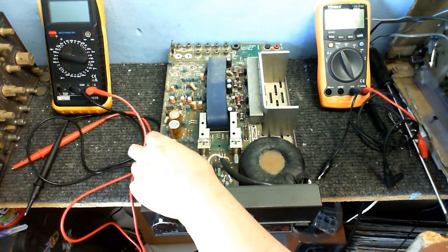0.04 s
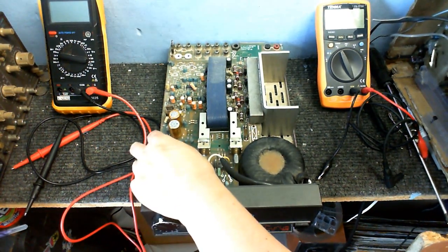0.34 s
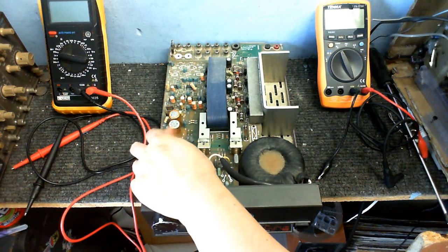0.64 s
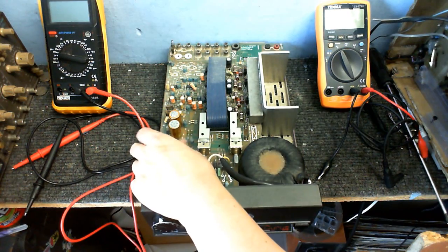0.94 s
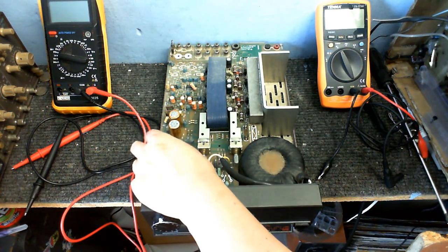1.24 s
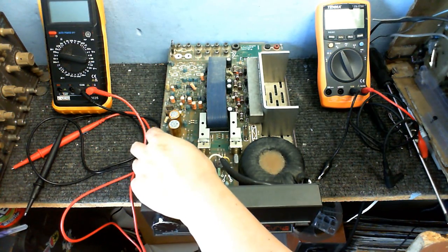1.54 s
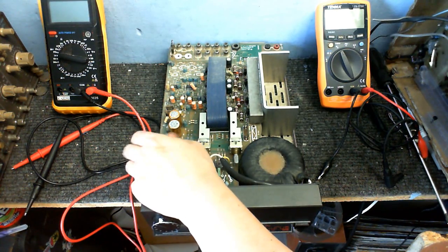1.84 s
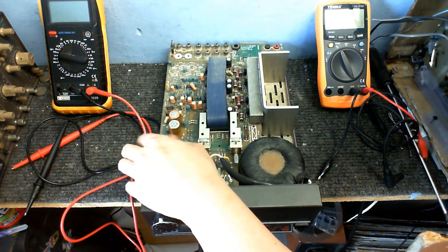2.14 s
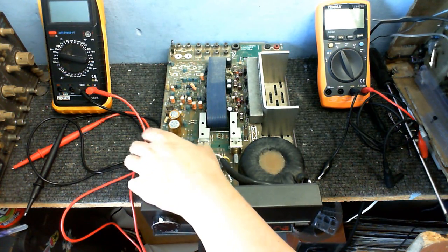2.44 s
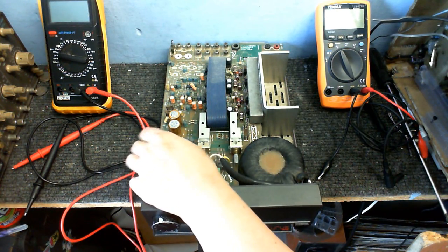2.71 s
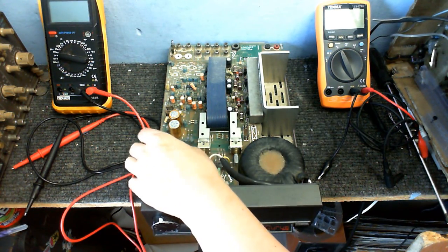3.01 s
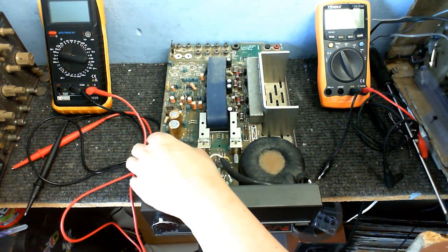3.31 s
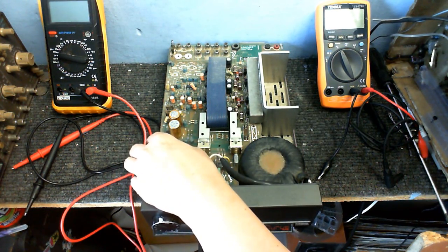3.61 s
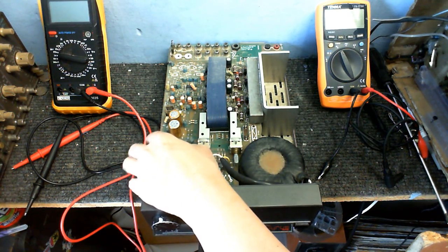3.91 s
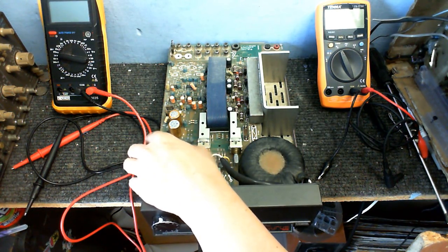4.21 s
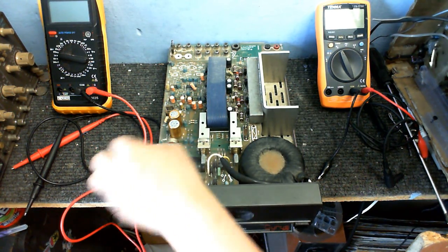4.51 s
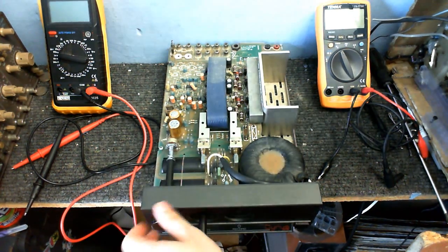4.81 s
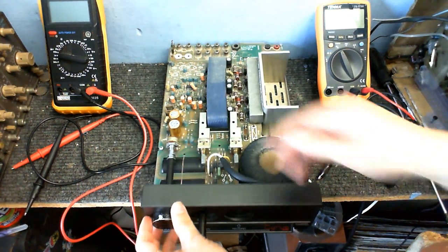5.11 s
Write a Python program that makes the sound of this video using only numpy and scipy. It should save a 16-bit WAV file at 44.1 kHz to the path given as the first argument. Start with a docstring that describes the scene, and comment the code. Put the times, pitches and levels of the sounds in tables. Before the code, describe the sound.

A screw is turned out of the metal front panel of an open amplifier. The tool ticks and grinds irregularly in the screw head, and the chassis answers with small knocks and short rings. After a louder cluster midway, the loosened screw clinks in its hole. Near the end an arm brushes softly past and the panel starts to drag. One nearby microphone in a small room picks up faint mains hum underneath.

```python
"""A workbench in a small room, one mono microphone nearby, on an open amplifier.
A screw is turned out of the metal front panel: the tool ticks and grinds in the screw head, the chassis
answers with knocks and short rings, and the loosened screw clinks in its hole. Late on, an arm brushes
softly past and the hand starts to pull the panel. Mains hum and room tone lie underneath."""
import sys
import numpy as np
from scipy import signal
from scipy.fft import rfft, irfft
from scipy.io import wavfile

SR = 44100
rng = np.random.default_rng(int(sys.argv[2]) if len(sys.argv) > 2 else 0)


def waveform_to_disk(signal):
    """Save audio, clipped to [-1, 1], as 16-bit WAV at the path in sys.argv[1]."""
    frames = np.transpose(np.atleast_2d(signal))
    scaled = np.clip(frames, -1, 1) * 32767
    samples = np.round(scaled).astype(np.int16)
    wavfile.write(sys.argv[1], SR, samples)


N = 227247
TIME = np.arange(N) / SR

# Event levels are relative within a table. Weight swells the lows; brightness tilts towards the treble.
# The tip catching in the screw head. Each row: start in seconds, level in dB, weight in dB,
# brightness in dB per octave, clack pitch in Hz.
TIP_CLICKS = [(0.082, -49.5, 17, 4, 2300), (0.129, -49.5, -15, -8, 2180), (0.159, -34.5, 0.5, -.5, 2240),
              (0.37, -47.5, -14, 2, 2410), (0.382, -51.5, 14.5, 3, 2300), (0.595, -44.5, 7, 4, 2080),
              (0.772, -36, -1.5, 1.5, 1980), (1.003, -39, 10.5, 3.66, 2020), (1.229, -47, 2, 0, 2050),
              (1.479, -41, -13, -1, 2030), (1.699, -43.5, -17, -4, 2190), (1.756, -48, -9, 2, 2200),
              (1.765, -47, -12, 1.5, 2150), (1.989, -46, 0, 1.5, 2010), (2.268, -55.5, 2, 4, 2020),
              (2.405, -43.5, -7.5, -3, 2290), (2.612, -38, -15, -2, 1760), (2.629, -29.5, 7.5, 1.5, 2480),
              (2.672, -33.5, -16, 2, 2340), (2.688, -34.5, 0, -2, 2380), (2.826, -33, -18, .5, 2070),
              (3.784, -37.5, -5, 1.5, 2060), (4.178, -38, -8.5, -.5, 2260), (4.473, -37, -21, -2, 2080),
              (4.993, -34, -21, -1, 2920), (5.032, -42, 1, 1, 2200)]
# The panel giving under tool or hand. Each row: start in seconds, level in dB, weight in dB,
# brightness in dB per octave, thud pitch in Hz, clack pitch in Hz.
PANEL_KNOCKS = [(0.567, -35, -2, -1.5, 680, 2110), (1.271, -30.5, -8.5, -1.5, 416, 1760),
                (1.515, -44, 13, 3.5, 500, 2000), (1.726, -43, -15, -7, 436, 1930),
                (2.243, -48, -3, 2, 606, 1930), (2.376, -49, -12, -2.5, 440, 1930),
                (2.845, -28.5, -1, 3, 591, 2540), (2.864, -27, -6.5, 0, 440, 1880),
                (3.181, -48.5, -3, -1.5, 420, 2140), (3.223, -48, 0.5, -0.5, 575, 2070),
                (3.907, -43, 9, 2.5, 650, 1910), (4.486, -34, -4, -1, 770, 2260),
                (4.894, -45, 3, -0.5, 452, 1510), (4.997, -35.5, -2.5, 0.5, 710, 1710)]
# The bare steel tip, lightly touched. Each row: start in seconds, level in dB, pitch in Hz.
TIP_PINGS = [(0.318, -50.5, 6700), (0.545, -43.5, 8830), (0.774, -36, 8050), (1.973, -46.5, 6900),
             (2.405, -39, 6760), (2.544, -37, 6860), (2.611, -42, 6800), (2.826, -35, 6750),
             (3.224, -50.5, 6630), (3.784, -37, 6700)]
# The loose screw in its hole. Each row: start in seconds, level in dB, brightness in dB per octave.
SCREW_CLINKS = [(3.589, -47.5, 2.5), (3.797, -44, 1), (3.944, -42.5, 5), (4.261, -44.5, 1.5),
                (4.271, -42.5, 2.5), (4.352, -38.5, 6.5), (4.368, -32.5, 3), (4.38, -37.5, 3)]
# Metal dragging on metal. Each row: time of the hardest push, swell and fade, all in seconds,
# level in dB, weight in dB, brightness in dB per octave.
SCRAPE_STROKES = [(0.003, 0.0037, 0.022, -49, 24, 4), (0.154, 0.1, .005, -60.5, 17, 5.5),
                  (0.345, .015, 0.033, -57, 2, 3), (1.238, 0.0078, 0.021, -53, 23.5, 5),
                  (1.297, 0.013, 0.01, -58, 20.5, -2), (1.731, 0.0046, 0.026, -43.5, 4.5, 0),
                  (2.02, 0.046, 0.0067, -40.5, -2.5, -2.5), (2.253, 0.021, 0.04, -49.5, 7, 0),
                  (2.38, 0.022, 0.017, -53.5, -2, -1), (2.635, .047, .055, -33.5, 8, 2),
                  (2.836, 0.0087, 0.017, -22.5, -26, -7), (2.875, 0.022, 0.017, -32, -7.5, -5),
                  (3.901, 0.015, 0.02, -50, 7.5, -3), (3.967, .035, 0.087, -49.5, -1.5, -1.5),
                  (4.277, 0.0063, 0.18, -51, -22, -8.5), (4.374, 0.021, 0.013, -30.5, -10, -4.5),
                  (4.898, .028, 0.023, -48, 14, 5), (4.998, .02, 0.036, -38.5, 0, 1.5)]
# Sheet metal flexing. Each row: start in seconds, level in dB, pitch in Hz, 60 dB decay in seconds.
SHEET_SNAPS = [(0.158, -27.5, 2990, 0.032), (0.162, -32, 478, 0.064), (0.567, -33, 1240, 0.0071),
               (1.2715, -13.5, 1730, 0.013), (1.283, -34, 171, 0.15), (2.241, -35.5, 705, 0.028),
               (2.376, -40, 2000, 0.043), (2.865, -33.5, 292, 0.13), (3.946, -44, 2070, 0.14),
               (4.997, -30.5, 750, 0.06)]
# The chassis rocking under the hand. Each row: start in seconds, level in dB, pitch in Hz.
CHASSIS_BUMPS = [(0.009, -50, 388), (0.067, -47.5, 408), (0.725, -56.5, 550), (0.931, -54, 432),
                 (1.021, -44.5, 423), (1.089, -47.5, 424), (1.649, -56, 418), (1.837, -60.5, 363),
                 (3.003, -51.5, 420), (3.088, -49.5, 413), (3.18, -51.5, 423), (3.225, -49.5, 593),
                 (3.27, -54, 422)]

# The six parts of a contact, low to high: thud, knock, clack, tick, ping, splash. Each row: gain in
# a tap and in a scrape in dB, reflections in dB, their 60 dB decay and their build-up in seconds.
CONTACT_PARTS = [(-6.5, -14, 2, 0.22, 0.0043), (-5, -13, 10.5, 0.2, 0.0014), (0, -5, 1, 0.23, 0.0046),
                 (-1.5, -7, 3, 0.21, 0.0029), (-1.5, -13.5, -2, 0.24, 0.00072),
                 (10.5, -23.5, 4, 0.19, 0.0028)]
# The balance of each kind of contact. Each gives the six parts in dB, thud first.
CLICK_MIX = (-12.5, -14.5, -1, -1, -1.5, -18.5)
KNOCK_MIX = (-1, -9, 1, -4.5, -10.5, -27.5)
PING_MIX = (-15.5, -52, -14, -13, -0.5, -26)
CLINK_MIX = (-16.5, -9, -1, -7.5, -16.5, -47)
SCRAPE_MIX = (-5, -9, 0.5, -1, -0.5, 0.5)
# The share of the weight each part takes, from 0 to 1: only thud and knock swell.
WEIGHT_SHARE = (1, .4, 0, 0, 0, 0)

# Resonances of the chassis, the loose screw, the pulled panel and the brushing.
# Each row: pitch in Hz, width in Hz, lift in dB.
CHASSIS_MODES = [(170.2, 11.4, 15), (302, 6.6, 6.5), (435.2, 23, 11.5), (471.4, 45, 2.5), (521, 74, 6),
                 (606.4, 20.5, 11), (753, 57, 9.5), (835.6, 12.8, 11.5), (994, 10.6, 9), (1177, 15, 10),
                 (1290, 12.5, 9), (1744, 20, 4.5), (1927, 32, 7), (2160, 20, 5), (2325, 18, 9.5),
                 (2446, 29, -5.5), (2536, 6.9, 9.5), (2822, 21, 8), (3075, 26, 7.5), (3260, 130, 5.5),
                 (4040, 50, 7), (4417, 31, 8.5), (4950, 10, 7), (5415, 31, 7), (5630, 50, 9),
                 (5950, 6.6, -15), (6924, 400, 7), (6740, 29, 7), (7140, 1520, -7.5), (8090, 410, 7)]
SCREW_MODES = [(823, 74, 6), (942, 60, 12), (1258, 35, 12.5), (1958, 32, 8.5), (2200, 170, 10.5)]
PANEL_MODES = [(759, 30, 5.5), (985, 21, 17), (1430, 24, 14.5), (1750, 50, 11)]
BRUSH_PEAKS = [(3170, 73, 8), (4540, 350, 5), (5470, 250, 3.5), (8040, 350, 12.5), (9750, 340, 5.5),
               (12100, 660, 19.5)]
# The swell of the arm going past. Each row: time in seconds, level in dB.
BRUSH_SWELL = [(4.45, -65), (4.842, -55.5), (5.03, -49.5), (5.1, -59.5)]
# The colour of the brushing and of the room tone. Each row: frequency in Hz, relative density in dB.
BRUSH_COLOUR = [(120, -39), (200, -16), (422, 3), (479, -2.5), (1010, -5), (1190, -12), (1910, -15.5),
                (2420, -9), (4580, -4.5), (8200, -21), (15500, -28)]
ROOM_COLOUR = [(15, -60), (25, -13.5), (64, -20.5), (91, -0.5), (133, -39), (169, -21), (523, -10),
               (666, -11), (970, -14), (1200, -15.5), (1300, -21.5), (1410, -18), (3530, -23),
               (8580, -31.5), (15500, -16.5)]
# Mains hum. Each row: pitch in Hz, rms level in dB.
MAINS_HUM = [(50, -75), (120, -64)]
# The microphone's response. Each row: frequency in Hz, gain in dB.
MIC_RESPONSE = [(7000, -2.5), (8400, -3.5), (9400, -9.5), (11500, -21.0), (13500, -26.5), (15500, -28)]

THUD_HZ, CLACK_HZ, PING_HZ = 430, 2050, 6830   # usual pitches of a contact
SLIDE_S = .014   # the tip slides this long before it catches


def taps():
    """Tool, panel and screw strike one another: clicks, knocks, pings and clinks."""
    struck, loose = np.zeros(N), np.zeros(N)
    for s, level_db, weight_db, tilt_db, clack_hz in TIP_CLICKS:
        add(struck, s - SLIDE_S, touch(CLICK_MIX, level_db, .0031, weight_db, tilt_db, clack_hz=clack_hz))
    for s, level_db, weight_db, tilt_db, thud_hz, clack_hz in PANEL_KNOCKS:
        knock = touch(KNOCK_MIX, level_db, .00096, weight_db, tilt_db, thud_hz=thud_hz, clack_hz=clack_hz)
        add(struck, s - SLIDE_S, knock)
    for s, level_db, hz in TIP_PINGS:
        add(struck, s - SLIDE_S, touch(PING_MIX, level_db, .00082, ping_hz=hz))
    for s, level_db, tilt_db in SCREW_CLINKS:
        add(loose, s - SLIDE_S, touch(CLINK_MIX, level_db, .0025, tilt_db=tilt_db))
    gain = np.sqrt(.0026 * SR)
    return gain * (struck + resonances(loose, SCREW_MODES))


def touch(mix, level_db, firm_rise_s, weight_db=0, tilt_db=0, firm_db=-38, softness=.25, **pitches):
    """All six parts sound together, and a light touch rises more slowly than a firm one."""
    rise_s = firm_rise_s * from_db(softness * (firm_db - level_db))
    parts = zip(part_levels(mix, level_db, weight_db, tilt_db), part_bands(**pitches), CONTACT_PARTS)
    return sum(from_db(db + tap_db) * contact(edges_hz, rise_s, *room)
               for db, edges_hz, (tap_db, _, *room) in parts)


def contact(edges_hz, rise_s, wet_db, t60, build_s, slide_db=-15, slide_rise_s=.0032, size=14000):
    """One band of a touch: the tip slides in, catches with a crack, and bench and walls reflect it."""
    t = TIME[:size] - SLIDE_S
    after = np.maximum(t, 0)
    age = after / max(rise_s, .0002)
    catch = age ** 2 * np.exp(2 * (1 - age))
    slide = from_db(slide_db) * np.exp(-abs(t) / slide_rise_s)
    reflections = from_db(-60 * after / t60) * (1 - np.exp(-after / build_s))
    envelopes = np.array([catch + slide, reflections])
    crack, tail = band(envelopes * rng.standard_normal((2, size)), *edges_hz)
    return unit_energy(crack) + from_db(wet_db) * unit_energy(tail)


def part_bands(thud_hz=THUD_HZ, clack_hz=CLACK_HZ, ping_hz=PING_HZ):
    """Edges in Hz of the six parts; the clack is the panel, the ping the steel tip."""
    return [(thud_hz / 3.27, thud_hz * 1.49), (620, 1400), (clack_hz - 290, clack_hz + 290),
            (2650, 5900), (ping_hz - 575, ping_hz + 575), (8400, 15000)]


def part_levels(mix, level_db, weight_db, tilt_db):
    """Level of each part: weight swells the lows, brightness tilts the whole about the clack."""
    octaves = np.log2(np.mean(part_bands(), axis=1) / CLACK_HZ)
    return level_db + np.array(mix) + weight_db * np.array(WEIGHT_SHARE) + tilt_db * octaves


def scrapes(points=3, swell_db=17.5):
    """Metal grinds on metal: each stroke is a run of slips at a few points, each with its own ring."""
    out = np.zeros(N)
    bands = part_bands(thud_hz=380, clack_hz=2095, ping_hz=7050)
    for s, swell_s, fade_s, level_db, weight_db, tilt_db in SCRAPE_STROKES:
        t = np.arange(-swell_s, fade_s, 1 / SR)
        push = from_db(-swell_db * np.maximum(-t / swell_s, t / fade_s))
        levels = part_levels(SCRAPE_MIX, level_db, weight_db, tilt_db)
        for _ in range(points):
            friction = push * slips(len(t), per_s=220, spread_db=1.5, hiss=.16) / np.sqrt(points)
            response = sum(from_db(db + scrape_db) * contact(edges_hz, .00051, *room)
                           for db, edges_hz, (_, scrape_db, *room) in zip(levels, bands, CONTACT_PARTS))
            add(out, s - swell_s - SLIDE_S, signal.fftconvolve(friction, response))
    return out


def slips(size, per_s, spread_db, hiss):
    """Stick-slip friction: uneven tiny jerks on a fine hiss."""
    strength = from_db(spread_db * np.clip(rng.standard_normal(size), -2, 2))
    direction = rng.choice([-1, 1], size)
    slipping = rng.random(size) < per_s / SR
    return rms_one(slipping * strength * direction) + hiss * rng.standard_normal(size)


def metal_rings(tip_lift_db=6):
    """Thin sheet flexes and rings on one clear pitch, and so does the steel tip at each ping."""
    out = np.zeros(N)
    for s, level_db, hz, t60 in SHEET_SNAPS:
        add(out, s, ring(level_db, hz, t60, rise_s=.00028))
    for s, level_db, hz in TIP_PINGS:
        add(out, s, ring(level_db + tip_lift_db, hz, t60=.035, rise_s=.0015))
    return out


def ring(level_db, hz, t60, rise_s):
    """One mode, struck and dying away."""
    t = np.arange(0, t60, 1 / SR)
    envelope = (1 - np.exp(-t / rise_s)) * from_db(-60 * t / t60)
    return from_db(level_db) * envelope * np.sin(2 * np.pi * hz * t)


def panel_drag(start_s=5.088, rise_s=.023, level_db=-41.5):
    """The hand pulls the panel: a steady run of slips rings a few of its modes."""
    friction = band(slips(N, per_s=440, spread_db=-.5, hiss=.95), 700, 3050)
    pull = np.clip((TIME - start_s) / rise_s, 0, 1)
    return from_db(level_db) * pull * rms_one(resonances(friction, PANEL_MODES))


def arm_brush(rustle_gain_db=6, rumble_gain_db=2, fade_s=.13):
    """The arm brushes past: a smooth rustle with a few peaks, over a low rumble."""
    s, db = np.transpose(BRUSH_SWELL)
    fade = np.clip(np.minimum(TIME - s[0], s[-1] + fade_s - TIME) / fade_s, 0, 1)
    rustle = from_db(rustle_gain_db) * rms_one(resonances(coloured_noise(BRUSH_COLOUR), BRUSH_PEAKS))
    rumble = from_db(rumble_gain_db) * band_noise(97, 167)
    return from_db(np.interp(TIME, s, db)) * fade * (rustle + rumble)


def chassis_rocking(length_s=.036, gain_db=-2, roughness=.5):
    """The chassis rocks on its mat with soft, hollow bumps."""
    out, t = np.zeros(N), np.arange(0, length_s, 1 / SR)
    arch = np.sin(np.pi * t / length_s)
    for s, level_db, hz in CHASSIS_BUMPS:
        add(out, s, from_db(level_db + gain_db) * arch * np.sin(2 * np.pi * hz * t))
    return out * (1 + roughness * band_noise(24.4, 139))


def bench_boom(sound, gain_db=-6, lag_s=.0137, decay_s=.0085):
    """Bench and room boom a moment after anything heavy, following the power in its lows."""
    keep = np.exp(-1 / (decay_s * SR))
    low_power = signal.lfilter([1 - keep], [1, -keep], band(sound, 131, 406) ** 2)
    swell = np.sqrt(np.interp(TIME - lag_s, TIME, low_power))
    return from_db(gain_db) * swell * band_noise(112.6, 197)


def room_background(rumble_db=-66, tone_db=-60.5):
    """The room behind the work: mains hum, a low rumble and steady room tone."""
    hum = sum(from_db(db) * np.sqrt(2) * np.sin(2 * np.pi * (hz * TIME + rng.random()))
              for hz, db in MAINS_HUM)
    rumble = from_db(rumble_db) * band_noise(103, 202)
    return hum + rumble + from_db(tone_db) * coloured_noise(ROOM_COLOUR)


def resonances(x, modes):
    """Each mode lifts or cuts its own pitch; the narrower it is, the longer it rings."""
    for hz, width_hz, lift_db in modes:
        radius = np.exp(-np.pi * width_hz / SR)
        feed = np.array([1, 0, -1]) * (1 - radius ** 2) / 2
        feedback = [1, -2 * radius * np.cos(2 * np.pi * hz / SR), radius ** 2]
        x = x + (from_db(lift_db) - 1) * signal.lfilter(feed, feedback, x + 1e-18)
    return x


def coloured_noise(spectrum):
    """Steady noise with the given spectrum, rms 1."""
    hz, db = np.transpose(spectrum)
    gain = from_db(np.interp(np.log(np.fft.rfftfreq(N, 1 / SR) + 1), np.log(hz), db))
    return rms_one(irfft(rfft(rng.standard_normal(N)) * gain, N))


def band_noise(low_hz, high_hz):
    """Steady noise in one band, rms 1."""
    return rms_one(band(rng.standard_normal(N), low_hz, high_hz))


def band(x, low_hz, high_hz):
    """Causal band-pass."""
    return signal.sosfilt(signal.butter(2, [low_hz, high_hz], "band", fs=SR, output="sos"), x + 1e-18)


def add(track, s, sound):
    """Mix a sound into a track, starting at s seconds."""
    at = int(s * SR)
    sound, at = sound[max(-at, 0):], max(at, 0)
    track[at:at + len(sound)] += sound[:max(N - at, 0)]


def from_db(db):
    """Decibels to gain."""
    return 10 ** (np.asarray(db) / 20)


def rms_one(x):
    """Scale to unit rms."""
    return x / np.sqrt(np.mean(x ** 2) + 1e-20)


def unit_energy(x):
    """Scale to unit energy."""
    return x / np.sqrt(np.sum(x ** 2) + 1e-20)


def scene():
    """At the bench: taps and scrapes ring through the chassis; both channels carry the same sound."""
    heard = resonances(taps() + scrapes(), CHASSIS_MODES)
    heard += metal_rings() + arm_brush() + panel_drag()
    heard += bench_boom(heard) + chassis_rocking() + room_background()
    return np.array([heard, heard])


def record(dry):
    """The microphone dulls the top octave, and the band ends steeply."""
    hz = np.fft.rfftfreq(N, 1 / SR)
    response = from_db(np.interp(hz, *np.transpose(MIC_RESPONSE)))
    dulled = irfft(rfft(dry) * response, N)
    cutoff_hz = 15720
    return signal.sosfilt(signal.ellip(12, .1, 80, cutoff_hz, fs=SR, output="sos"), dulled)


dry = scene()
out = record(dry)
waveform_to_disk(out)
```